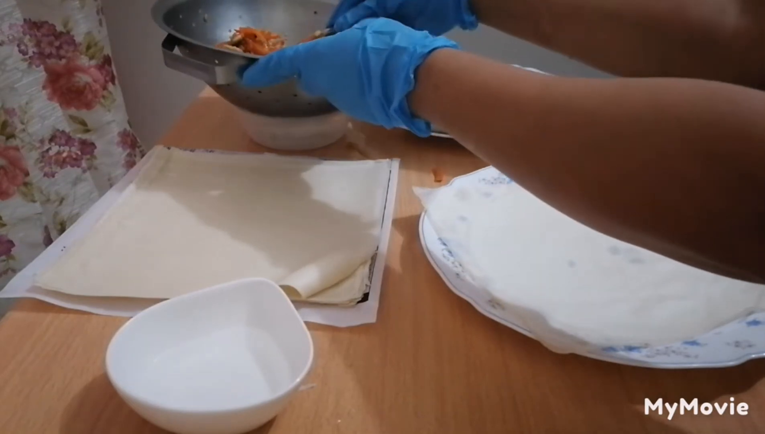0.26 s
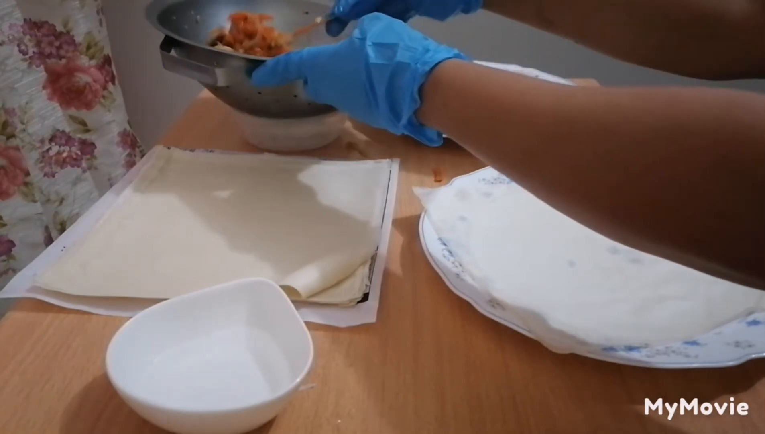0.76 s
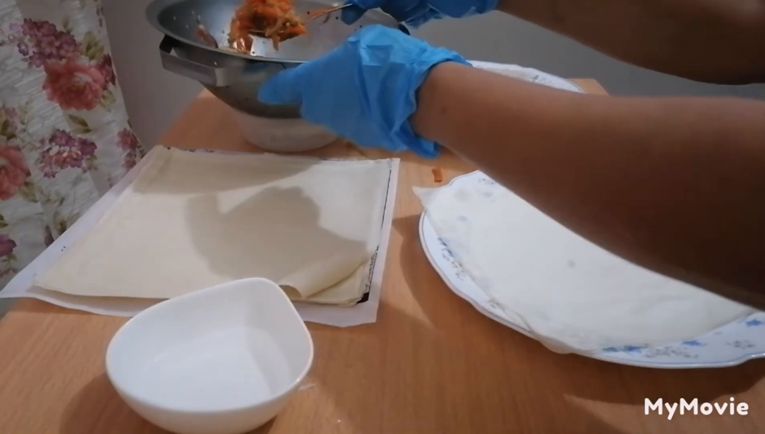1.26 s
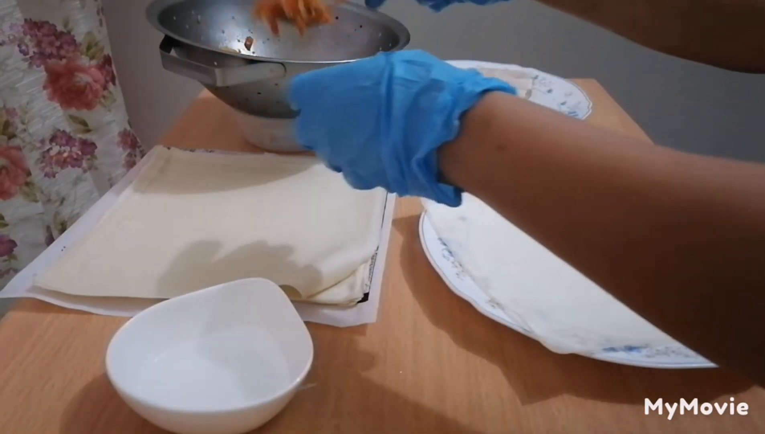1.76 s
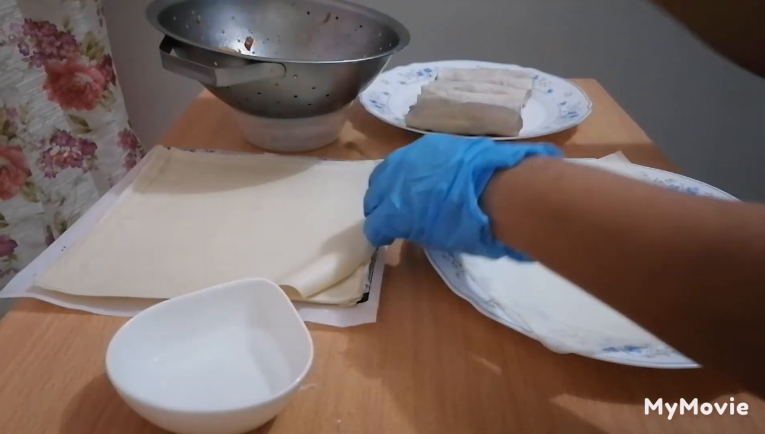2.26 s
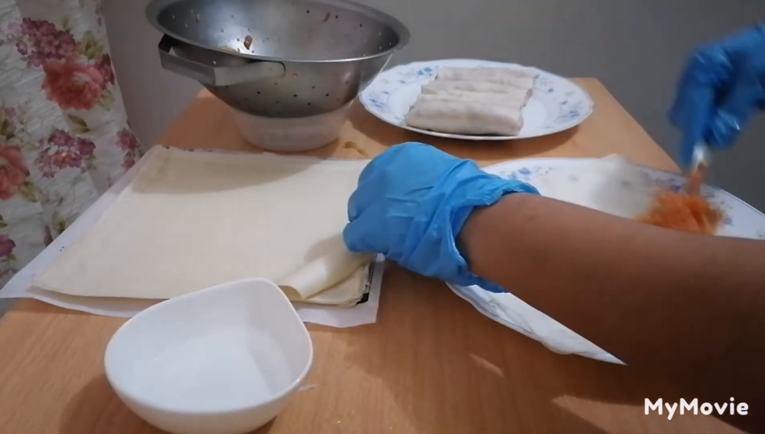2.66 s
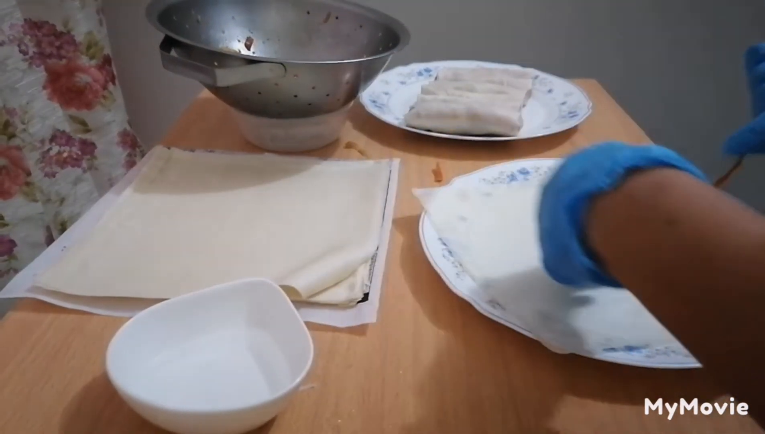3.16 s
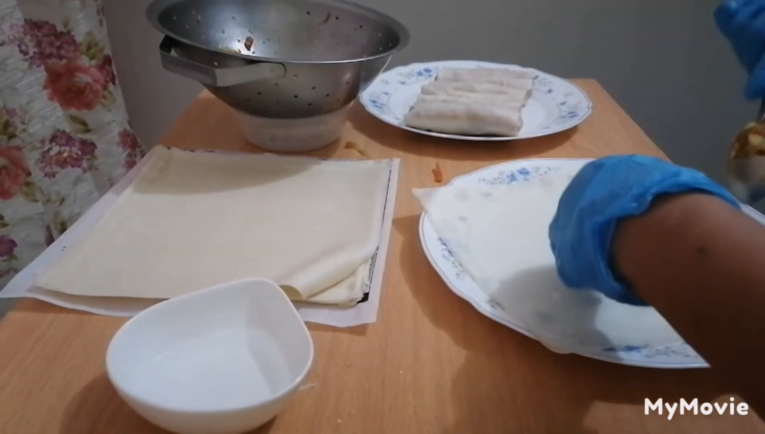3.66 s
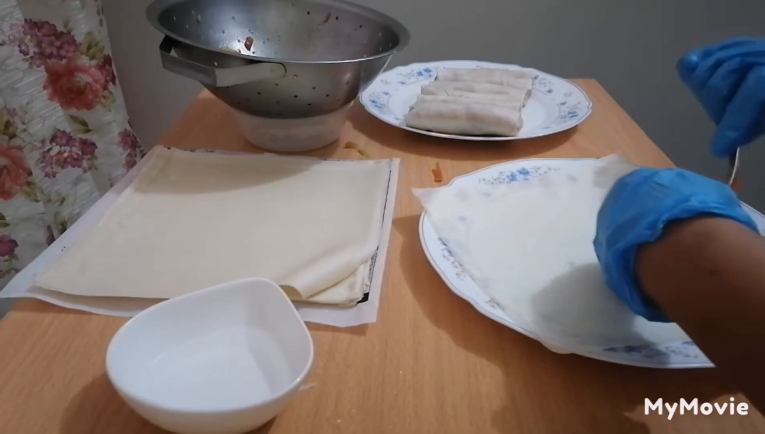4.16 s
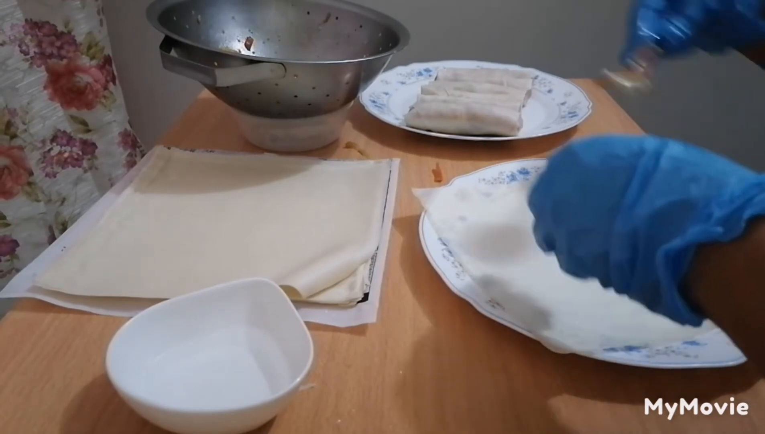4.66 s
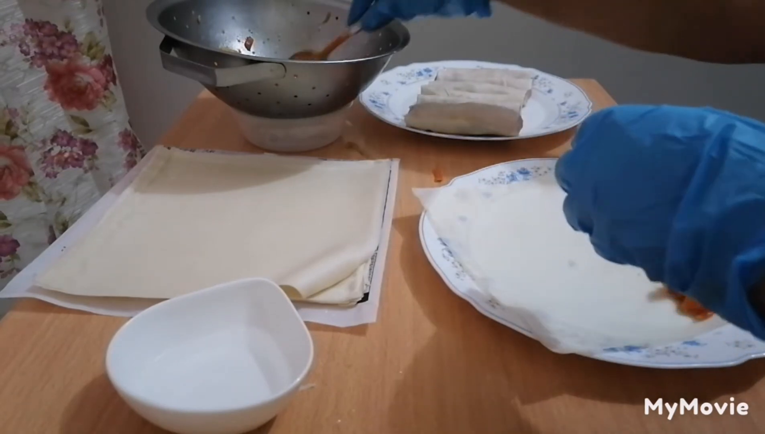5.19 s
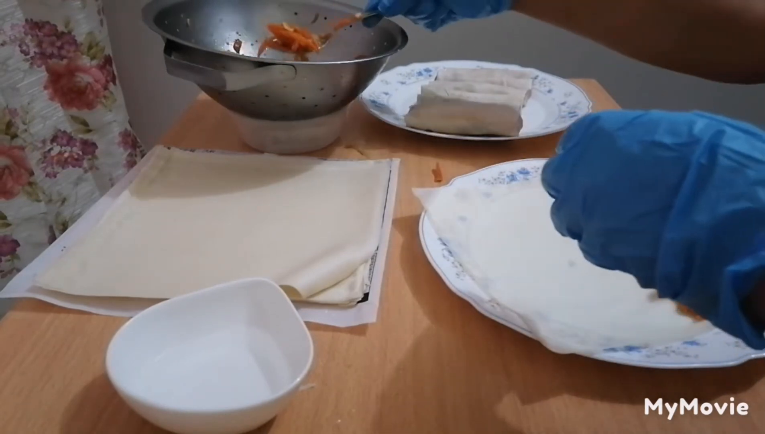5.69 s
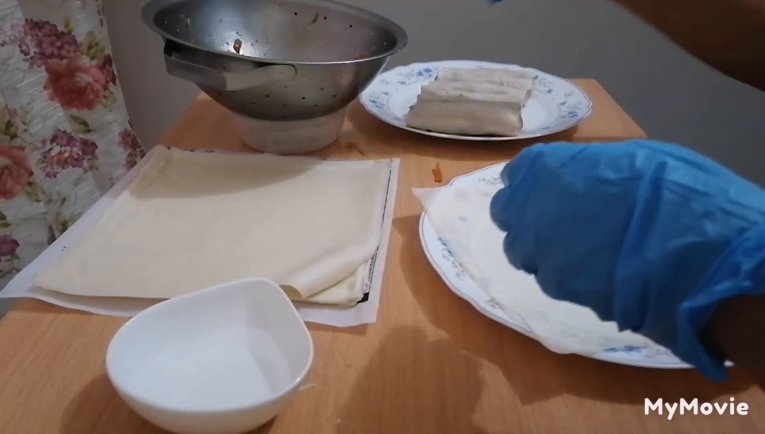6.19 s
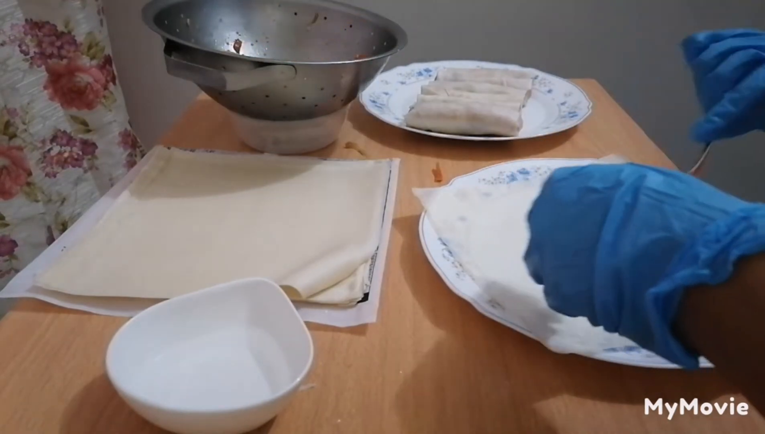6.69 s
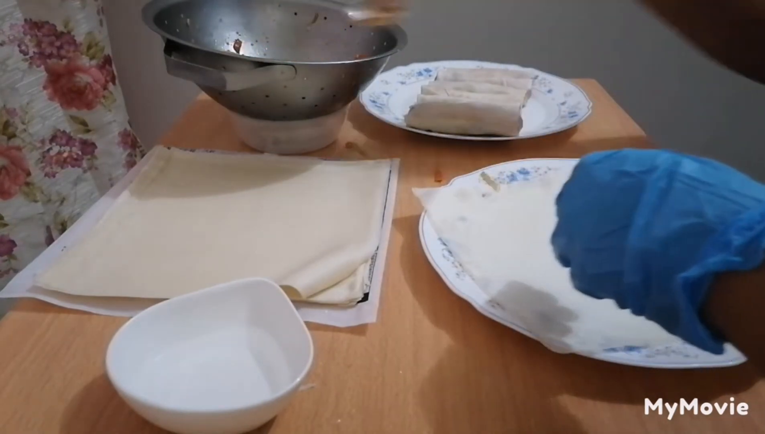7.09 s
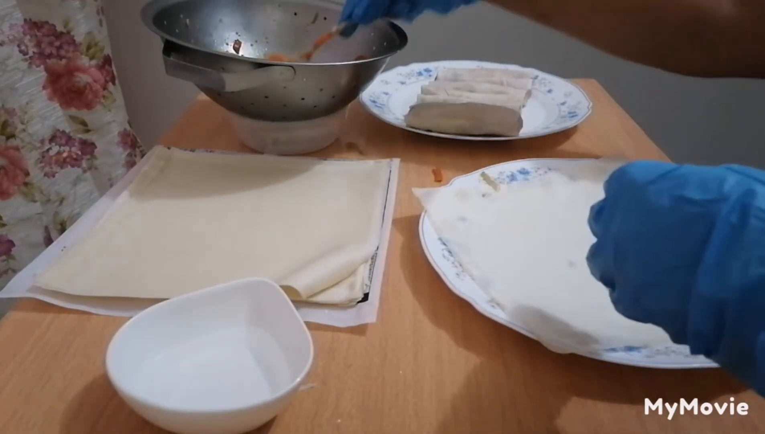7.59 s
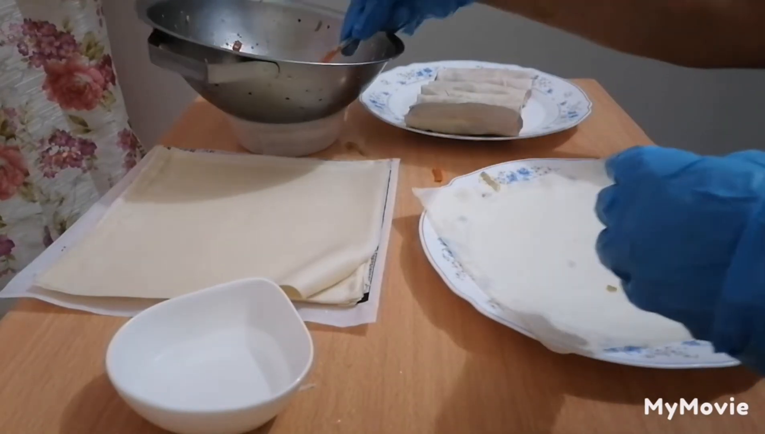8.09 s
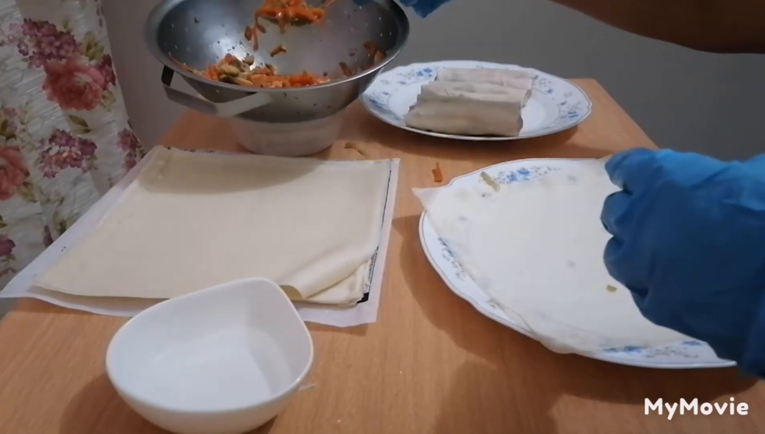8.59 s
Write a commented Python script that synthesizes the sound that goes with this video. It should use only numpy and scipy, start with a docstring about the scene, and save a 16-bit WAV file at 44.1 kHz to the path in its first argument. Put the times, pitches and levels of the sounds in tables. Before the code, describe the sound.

Close to the microphone in a small room, quiet food preparation goes on over a steady low appliance hum. Soft, wet stirring gives way to rubber gloves sliding on a thin pastry wrapper, with tiny squeaks. Past the middle come bright spoon clinks on a steel colander and one loud knock on a plate. Near the end more metal scraping leads into a quick rattle of the shifting colander.

```python
"""Filling spring rolls.

At a kitchen table a spoon digs through wet shredded vegetables, clinks and scrapes in a steel colander
and knocks on a plate. Gloved fingers peel and smooth a thin wrapper. Friction is stick-slip; blows ring
decaying modes. An appliance hums in the small room; a close phone's two microphone ports ring unalike."""
import sys
import numpy as np
from scipy import signal
from scipy.fft import rfft, irfft, next_fast_len
from scipy.io import wavfile
from scipy.ndimage import uniform_filter1d

SR = 44100
rng = np.random.default_rng(int(sys.argv[2]) if len(sys.argv) > 2 else 0)


def generate_wav(sig):
    """Save sig (samples, or channels by samples) to the path in sys.argv[1] as 16-bit PCM at SR."""
    pcm = np.round(np.clip(np.atleast_2d(sig).T, -1, 1) * 32767).astype(np.int16)
    wavfile.write(sys.argv[1], SR, pcm)


N = 389844
T = np.arange(N) / SR
RING_T = T[:SR // 2]

# motor partials: freq_hz, rms_db, waver_db
HUM_PARTIALS = [(100.2, -52.5, 1), (183.1, -69, 4), (198.7, -67.5, 4), (230.3, -69, -1.5),
                (299.6, -60.5, 0.9), (382.3, -76, 2), (423.7, -76.5, 0.5), (572, -80, 1), (726, -81, 5.5),
                (760.5, -79.5, 4.5), (900, -86.5, 6.5)]
# air noise spectrum: freq_hz, density_db
AIR_SPECTRUM = [(20, -2), (40, -4.5), (58, 2.5), (115, -6), (150, -13), (188, -4), (260, -4.5),
                (350, -11.5), (620, -20), (770, -19), (1050, -27), (3000, -33), (4000, -39), (6800, -36),
                (8700, -41.5), (10400, -39), (15000, -40)]
# spoon strokes through filling: peak_s, level_db, length_s
DIG_STROKES = [(.46, -67, .13), (.645, -63, 0.27), (.86, -68.5, 0.18), (1.49, -74, 0.22), (7.52, -65, 0.37),
               (7.99, -55.5, 0.11), (8.47, -59, 0.03)]
# rubber and filling squeaks: peak_s, level_db, pitch_hz, half_length_s
SQUEAK_TONES = [(0.454, -65, 1230, 0.056), (0.652, -67.5, 1192, 0.1), (0.659, -61.5, 2020, 0.07),
                (.78, -69, 2010, .06), (0.879, -72, 1750, 0.13), (1.45, -70, 1183, 0.057),
                (2.595, -61.5, 1645, 0.087), (2.57, -64, 1890, 0.061), (3.073, -66, 1650, 0.12),
                (5.661, -71, 1480, 0.1), (7.555, -69, 1900, .1), (8.481, -51.5, 1180, 0.016)]
# glove and wrapper slides: peak_s, level_db, length_s, emphasis_hz
RUB_STROKES = [(0.463, -72, 0.12, 9400), (.64, -67, 0.2, 10500), (0.787, -75.5, 0.22, 9500),
               (1.137, -76, 0.24, 10000), (1.477, -75.5, 0.25, 4500), (1.82, -76, 0.26, 4500),
               (2.054, -70, 0.22, 9000), (2.474, -64, 0.43, 5000), (2.507, -56.5, 0.074, 6000),
               (2.575, -65, 0.046, 9000), (2.856, -72, 0.11, 6000), (3.056, -64.5, 0.42, 7400),
               (3.344, -68, 0.2, 3900), (3.502, -60.5, 0.21, 4960), (3.71, -77.5, 0.76, 6000),
               (3.87, -55.5, 0.073, 7500), (3.92, -63.5, 0.21, 3300), (4.173, -74, 0.18, 9500),
               (4.474, -65, .17, 5700), (4.6, -74.5, 0.23, 9000), (6.472, -76.5, 0.12, 5440),
               (7.523, -74, 0.32, 6100), (7.751, -68, 0.046, 5700), (7.885, -72.5, 0.055, 7500)]
# wrapper snaps and sharp edges of knocks and taps: start_s, level_db
CLICK_HITS = [(2.508, -47), (3.868, -62), (4.036, -64), (4.165, -58), (4.648, -59), (6.607, -61),
              (6.668, -55), (6.828, -64), (7.123, -53)]
# knocks on the plate, then quick clatter of the rocking colander: start_s, level_db, contact_s
KNOCK_HITS = [(2.867, -40.5, 0.0011), (5.264, -49, 0.00037), (6.667, -24, 0.0003), (7.124, -42, 0.0013),
              (8.075, -44, 0.00019), (8.109, -37.5, 0.00014), (8.286, -44.5, 0.00029),
              (8.344, -36.5, 0.00018), (8.384, -48, 0.00016), (8.4, -40.5, 0.00017), (8.461, -51.5, .0002)]
# soft pushes on the table top: start_s, level_db
THUMP_HITS = [(3.856, -43), (6.668, -47), (8.079, -46)]
# colander rocking on its stand: start_s, level_db
ROCK_HITS = [(5.188, -43), (5.263, -36.5), (8.344, -44)]
# spoon edge on steel: start_s, level_db, attack_s, hold_s, t60_s, resonance_hz, lift_db, treble_db
SCRAPE_STROKES = [(5.259, -44, 0.0039, 0.056, 0.22, 1530, 7, -2),
                  (5.336, -45, .005, 0.039, 0.13, 2200, 3.5, -6),
                  (5.385, -43, .004, 0.018, .14, 2600, 2, -6),
                  (7.949, -37.5, 0.0075, 0.012, 0.27, 2630, 5.5, -2),
                  (7.966, -33.5, 0.0034, 0.016, .11, 2320, 9.5, -3),
                  (8.213, -51, 0.18, 0.046, 0.1, 2100, 14.5, -12)]
# spoon taps on the colander: start_s, level_db, low_hz, high_hz
CLINK_HITS = [(5.264, -31.5, 1100, 15700), (5.277, -31, 4600, 16000), (5.343, -40, 2500, 9000),
              (5.395, -43, 2200, 12000), (6.726, -55.5, 2200, 7700), (7.269, -33, 6660, 8800),
              (7.956, -30, 2400, 16000), (7.975, -33.5, 2000, 12000), (7.991, -37, 4500, 16000),
              (8.024, -47, 5500, 11000)]
# colander sliding on its stand: start_s, level_db, attack_s, hold_s, t60_s
DRAG_STROKES = [(8.068, -51, 0.0035, 0.066, 0.069), (8.261, -48.5, 0.027, 0.079, 0.13),
                (8.345, -46.5, .005, 0.045, 0.13)]
# friction and impact spectra: freq_hz, density_db
FILLING_SPECTRUM = [(200, -17), (450, -3), (750, 3), (1100, -2.5), (1700, -1), (2200, -4), (3200, -13.5),
                    (4000, -27), (10000, -22.5), (15500, -73)]
WRAPPER_SPECTRUM = [(300, -7), (1000, 2.5), (1700, -4.5), (2900, 11), (4000, -1.5), (5500, -1.5),
                    (8000, -6.5), (10500, -2.5), (12500, -11), (15000, -2.5)]
CLICK_SPECTRUM = [(500, -10), (3000, 3.5), (6000, -3), (10000, -5.5), (15000, -5.5)]
THUD_SPECTRUM = [(60, -40), (150, -26), (400, 13.5), (700, -3.5), (1300, 2), (1600, -19), (3200, -3.5),
                 (4000, -32), (15000, -25)]
STEEL_SPECTRUM = [(300, -18), (1100, -21), (1600, 0.5), (2200, -1), (2650, 3.5), (3250, 8.5), (3900, 0),
                  (5100, 1), (8000, 3), (11000, .5), (13000, 2.5), (15500, 3)]
# modes of struck bodies: freq_hz, level_db, t60_s
PLATE_MODES = [(215, -2.5, 0.1), (283, 6, 0.12), (380, -3, 0.19), (461.7, 11, 0.11), (522, 6.5, 0.11),
               (616, 14.5, 0.049), (669, 14, 0.049), (1006, 5.5, 0.025), (1200, 6.5, 0.07),
               (1333, -10, .12), (2105, -1, 0.082), (2900, -10, 0.019), (3170, 4, 0.031)]
TABLE_MODES = [(117.7, 12, 0.34), (132, 2, 0.17), (230, -25, .12), (524, 2, 0.15)]
STAND_MODES = [(790, 13.4, 0.19), (832, 4.6, .09), (905, 8.9, 0.11), (973, 7.5, 0.085), (1030, 2, 0.097)]
COLANDER_MODES = [(794, -8.5, 0.35), (1470, -10, 0.25), (2470, -6, 0.04), (2600, -3, 0.12),
                  (3360, 5, 0.083), (3273, 7, 0.08), (5100, -12, 0.1), (6680, -7, 0.08), (7190, -5, .09),
                  (7400, 2, 0.13), (9400, -12, 0.043), (10100, -6, 0.091), (11300, -3, 0.13)]
# microphone port responses: freq_hz, left_db, right_db
PORT_RESPONSES = [(390, -7.5, -9.5), (890, 1.5, 0.5), (1870, -5.5, -0.5), (3220, -1, -1.5), (3940, -5, 0.5),
                  (5500, 3.5, 6.5), (6570, -7.5, 7.5), (7160, 1, 17), (7100, 0.5, 14.5), (8580, -2, 3.5),
                  (9700, 8.5, -8.5), (9970, 10.5, -2.5), (10930, 5.5, -2), (13600, -3, -8.5),
                  (15300, -7, -3)]


def undb(db):
    """Decibels to gain."""
    return 10 ** (np.asarray(db) / 20)


def unit(x):
    """Scale to rms 1."""
    return x / np.sqrt(np.mean(x ** 2))


def colour(x, spectrum):
    """Filter by (freq_hz, gain_db) points."""
    hz, db = np.transpose(spectrum)
    size = next_fast_len(x.shape[-1], True)
    bins_hz = np.maximum(np.fft.rfftfreq(size, 1 / SR), 1)
    gain = undb(np.interp(np.log(bins_hz), np.log(hz), db))
    return irfft(rfft(x, size) * gain, size)[..., :x.shape[-1]]


def convolve(x, response):
    """Convolve, cut to N samples."""
    return signal.oaconvolve(x, response)[:N]


def walk(rate_hz):
    """Random wander, spread near 1."""
    return 1.2 * np.interp(T * rate_hz, np.arange(4096), rng.standard_normal(4096))


def fade(t60_s):
    """Exponential decay."""
    return np.exp(-np.log(1000) * RING_T / t60_s)


def ring(modes):
    """Struck modes, starting at rms 1."""
    rms = np.sqrt(sum(undb(db) ** 2 for _, db, _ in modes) / 2)
    return sum(undb(db) * fade(t60_s) * np.sin(2 * np.pi * hz * RING_T) for hz, db, t60_s in modes) / rms


def burst(spectrum, t60_s):
    """Dense modes as decaying noise."""
    return unit(colour(rng.standard_normal(len(RING_T)), spectrum)) * fade(t60_s)


def slips(rate_hz, spread_db):
    """Stick-slip: force impulses of random time and size."""
    sizes = undb(spread_db * np.minimum(rng.exponential(size=N), 3)) * rng.choice([-1, 1], N)
    return unit(sizes * (rng.random(N) < rate_hz / SR))


def swell(peak_s, db, length_s, rise_share=0.53, speed_power=2.2):
    """Free stroke gain: friction follows hand speed."""
    knots_s = [peak_s - rise_share * length_s, peak_s, peak_s + (1 - rise_share) * length_s]
    speed = np.sin(np.pi / 2 * np.interp(T, knots_s, [0, 1, 0]))
    return undb(db) * speed ** speed_power


def press(start_s, db, attack_s, hold_s, t60_s):
    """Pressed stroke gain: force builds, holds, decays."""
    build = np.sin(np.pi / 2 * np.clip((T - start_s) / attack_s, 0, 1)) ** 2
    released_s = np.maximum(T - start_s - attack_s - hold_s, 0)
    return undb(db) * build * np.exp(-np.log(1000) * released_s / t60_s)


def soften(blow, contact_s):
    """Spread a blow over its contact time; longer is duller."""
    pulse = RING_T * fade(contact_s * 2)
    return signal.fftconvolve(blow, pulse / pulse.sum())


def place(hits):
    """Mix (start_s, level_db, sound) hits into one track."""
    out = np.zeros(N)
    for start_s, db, sound in hits:
        i = int(start_s * SR)
        out[i:i + len(sound)] += undb(db) * sound[:N - i]
    return out


def whiten(response):
    """Flatten broad colour; keep early echoes and fine ripple."""
    spectrum = rfft(response)
    broad = np.sqrt(uniform_filter1d(np.abs(spectrum) ** 2, size=250))
    return irfft(spectrum / broad)[:len(response) // 2] * np.linalg.norm(response)


def appliance_hum(right_bias_db=4.0):
    """Motor partials wavering in level and phase."""
    hum = np.zeros(N)
    for hz, db, waver_db in HUM_PARTIALS:
        amplitude = np.sqrt(2) * undb(db + waver_db * np.tanh(walk(9)))
        hum += amplitude * np.sin(2 * np.pi * hz * T + 0.12 * waver_db * walk(8))
    return hum * undb([[-right_bias_db / 2], [right_bias_db / 2]])


def room_air(mid_db=-58, right_bias_db=0.56):
    """Soft air noise, wider in the treble."""
    mid, side = colour(rng.standard_normal((2, N)), AIR_SPECTRUM)
    side = colour(side, [(25, -7), (70, -10.5), (250, -8), (600, -0.5), (1500, 1.5), (4000, 0.5)])
    air = np.array([mid + side, mid - side]) / np.std(mid) * undb(mid_db + 0.15 * walk(2.3))
    return air * undb([[-right_bias_db / 2], [right_bias_db / 2]])


def digging():
    """Coarse spoon slips, muffled by wet filling."""
    force = slips(rate_hz=1100, spread_db=3.5) * undb(2.8 * np.tanh(walk(80)))
    return unit(colour(force, FILLING_SPECTRUM)) * sum(swell(*stroke) for stroke in DIG_STROKES)


def squeaking(pitch_wobble=0.037):
    """Near-periodic stick-slip of rubber and filling: brief unsteady tones."""
    drift = 1 + pitch_wobble * walk(220)
    out = np.zeros(N)
    for peak_s, db, hz, half_length_s in SQUEAK_TONES:
        near = np.abs(T - peak_s) < half_length_s
        envelope = np.cos(np.pi / 2 * (T[near] - peak_s) / half_length_s) ** 2
        out[near] += undb(db) * envelope * np.sin(2 * np.pi * np.cumsum(hz * drift[near]) / SR)
    return out


def rustling(gain_db=1.3, lift_db=5.5, crease_db=-6):
    """Fine glove-on-wrapper friction with popping creases, coloured per stroke."""
    force = slips(rate_hz=2200, spread_db=2.5) * undb(1.9 * np.tanh(walk(60)))
    creases = undb(crease_db) * slips(rate_hz=130, spread_db=4)
    friction = colour(force + creases, WRAPPER_SPECTRUM)
    out = np.zeros(N)
    for peak_s, db, length_s, hz in RUB_STROKES:
        near = np.abs(T - peak_s) < length_s
        stroke = colour(friction[near], [(hz / 2, 0), (hz, lift_db), (hz * 2, 0)])
        out[near] += unit(stroke) * swell(peak_s, db + gain_db, length_s)[near]
    return out


def clicking():
    """Short bright clicks: wrapper snaps and the sharp edge of knocks and taps."""
    return place((start_s, db, burst(CLICK_SPECTRUM, t60_s=0.022)) for start_s, db in CLICK_HITS)


def knocking(thud_db=-2):
    """Plate knocks, then the rocking colander's clatter; both use one mode set plus a dull thud."""
    hits = []
    for start_s, db, contact_s in KNOCK_HITS:
        blow = ring(PLATE_MODES) + undb(thud_db) * burst(THUD_SPECTRUM, t60_s=0.06)
        hits.append((start_s, db, soften(blow, contact_s)))
    return place(hits)


def thumping():
    """A push of hand or spoon rings the wooden top."""
    return place((start_s, db, ring(TABLE_MODES)) for start_s, db in THUMP_HITS)


def rocking():
    """The colander's foot lands softly and rings the stand."""
    landing = soften(ring(STAND_MODES), contact_s=0.0004)
    return place((start_s, db, landing) for start_s, db in ROCK_HITS)


def scraping(modes_db=-13, grip_db=2.5):
    """The spoon's edge chatters over perforated steel, driving the colander's modes."""
    force = slips(rate_hz=1900, spread_db=4) * undb(np.tanh(walk(130)) + grip_db * np.tanh(walk(40)))
    modes = ring(COLANDER_MODES)
    body = undb(modes_db) * convolve(force, modes / np.linalg.norm(modes))
    wall, out = np.zeros((2, N))
    for _ in range(5):  # the moving contact feeds wall mode clusters in turn
        cluster = convolve(force * rng.choice([-1, 1], N), burst(STEEL_SPECTRUM, t60_s=0.018))
        wall += unit(cluster) * undb(6.8 * np.tanh(walk(30)))
    for *stroke, hz, lift_db, treble_db in SCRAPE_STROKES:
        resonance = [(0.7 * hz, 0), (0.88 * hz, lift_db), (1.15 * hz, lift_db), (1.35 * hz, 0)]
        shelf = [(10000, 0), (14000, treble_db)]
        out += (body + unit(colour(wall, resonance + shelf))) * press(*stroke)
    return out


def clinking(modes_db=-11):
    """Spoon taps steel; where and how lightly it lands sets the band that rings."""
    hits = []
    for start_s, db, low_hz, high_hz in CLINK_HITS:
        tap = burst(STEEL_SPECTRUM, t60_s=0.065) + undb(modes_db) * ring(COLANDER_MODES)
        tap = signal.sosfilt(signal.butter(7, low_hz, "high", fs=SR, output="sos"), tap)
        tap = signal.sosfilt(signal.butter(2, high_hz, fs=SR, output="sos"), tap)
        hits.append((start_s, db, tap))
    return place(hits)


def dragging(judder_hz=62.1, rate_spread=0.15, depth_db=15):
    """The pushed colander judders on its stand; friction drops after each catch."""
    catch_phase = np.cumsum(judder_hz * (1 + rate_spread * walk(40))) / SR % 1
    judder = slips(rate_hz=3100, spread_db=3) * undb(-depth_db * catch_phase)
    return unit(colour(judder, FILLING_SPECTRUM)) * sum(press(*stroke) for stroke in DRAG_STROKES)


def room(x, t60_s=0.22, tail_db=-5, scatter_db=-2, wall_s=0.011, wall_db=-15.5):
    """Direct path, dish scatter, one near wall and a short tail with near-mono bass."""
    mid, side = rng.standard_normal((2, len(RING_T)))
    side = colour(side, [(250, -12), (700, -5.5), (1500, 2.5)])
    channels = []
    for noise in (mid + side, mid - side):
        tail = noise * fade(t60_s) * (1 - fade(0.069))
        scatter = burst([(400, -14), (1200, 0), (15000, 0)], t60_s=0.014)
        response = undb(tail_db) * tail / np.linalg.norm(tail)
        response += undb(scatter_db) * scatter / np.linalg.norm(scatter)
        response[0] += 0.72  # direct path
        response[int(wall_s * SR) + rng.integers(12)] += undb(wall_db)
        channels.append(convolve(x, whiten(response)))
    return channels


def scene():
    """Table work through room and ports, over hum and air."""
    friction = scraping() + digging() + dragging() + rustling()
    work = friction + clicking() + squeaking() + clinking() + rocking() + knocking() + thumping()
    left, right = room(work)
    ports = np.array(PORT_RESPONSES)
    at_phone = np.array([colour(left, ports[:, [0, 1]]), colour(right, ports[:, [0, 2]])])
    return at_phone + appliance_hum() + room_air()


def record(dry):
    """The phone's steep low-pass."""
    cutoff_hz = 15400
    return signal.sosfilt(signal.ellip(10, 0.2, 80, cutoff_hz, fs=SR, output="sos"), dry)


dry = scene()
out = record(dry)
generate_wav(out)
```